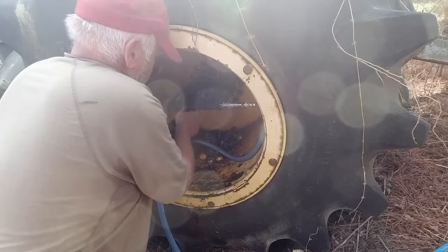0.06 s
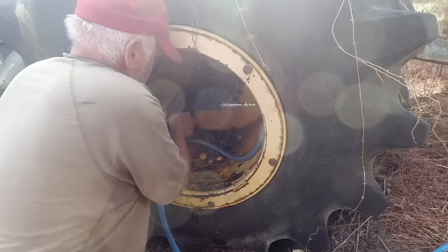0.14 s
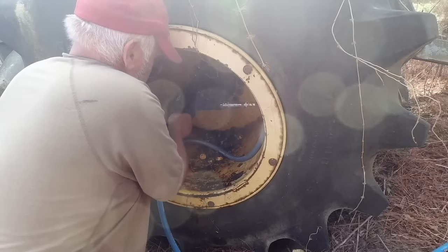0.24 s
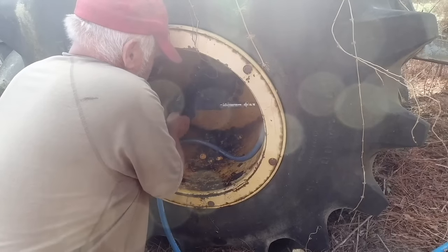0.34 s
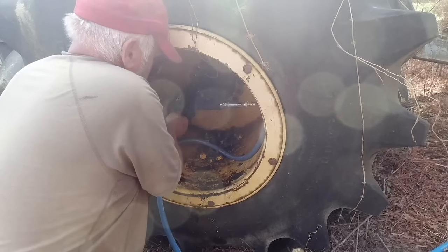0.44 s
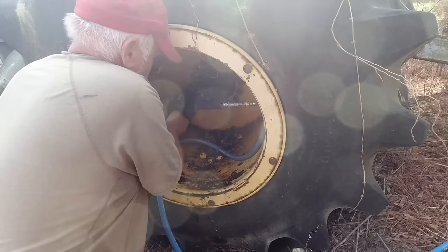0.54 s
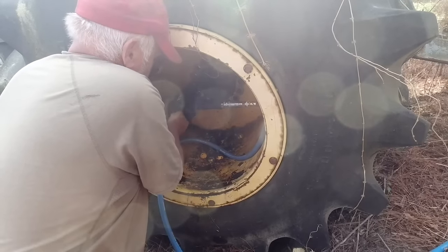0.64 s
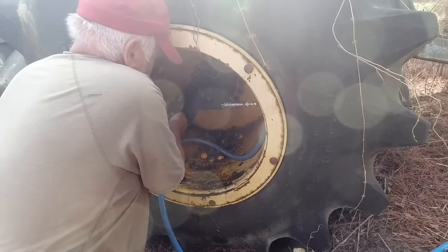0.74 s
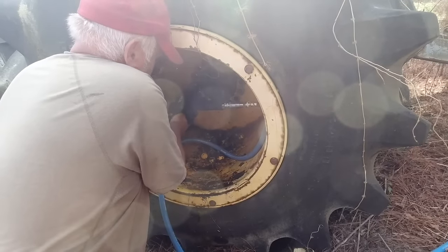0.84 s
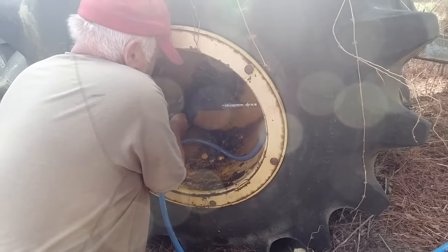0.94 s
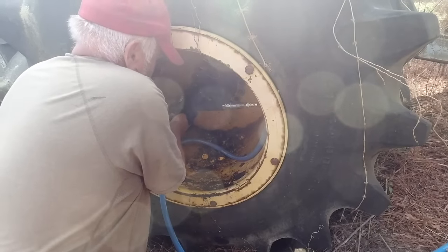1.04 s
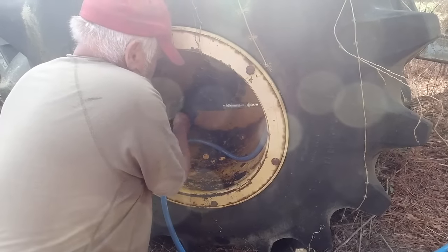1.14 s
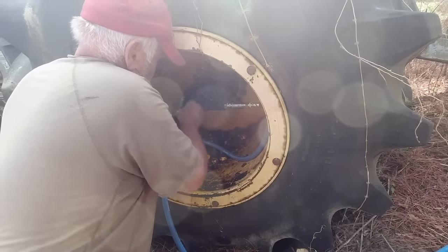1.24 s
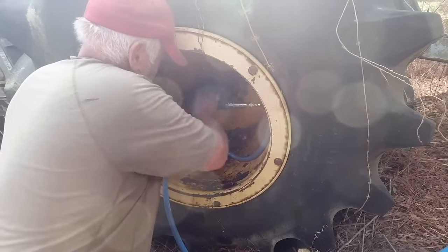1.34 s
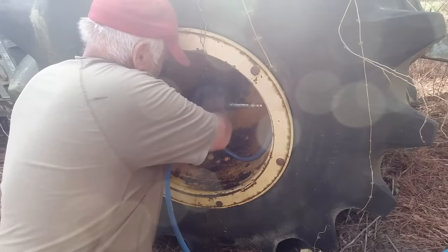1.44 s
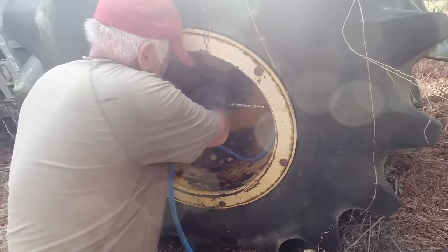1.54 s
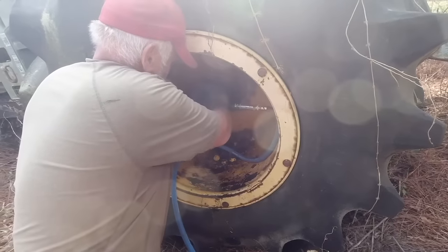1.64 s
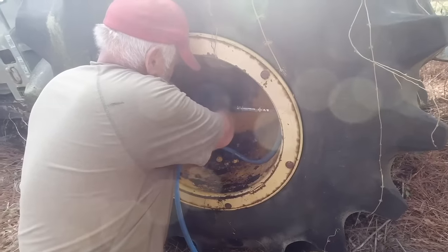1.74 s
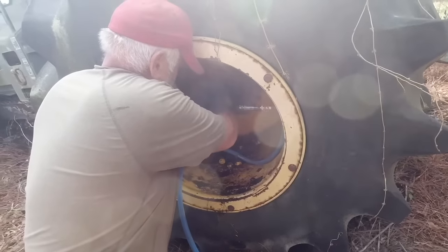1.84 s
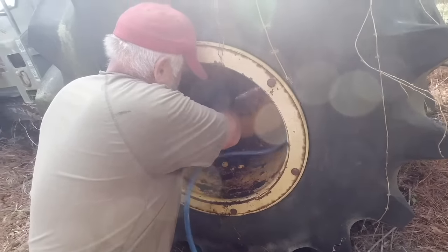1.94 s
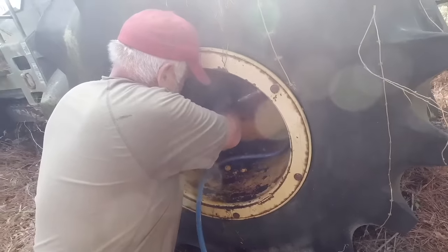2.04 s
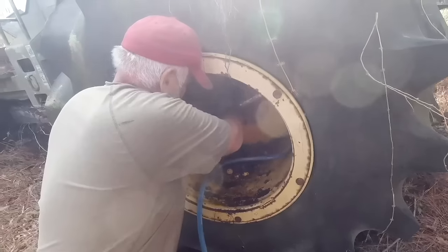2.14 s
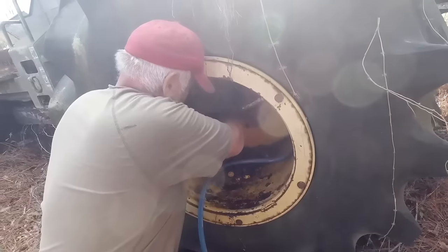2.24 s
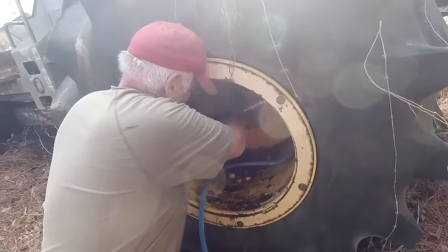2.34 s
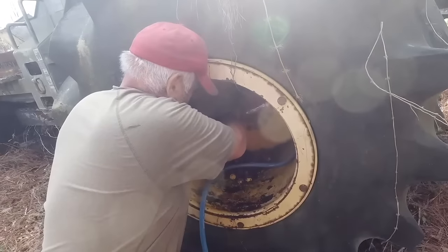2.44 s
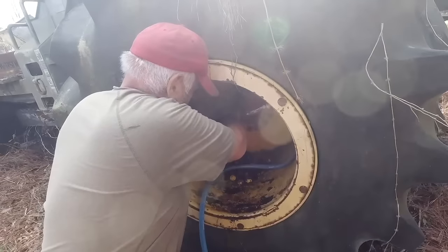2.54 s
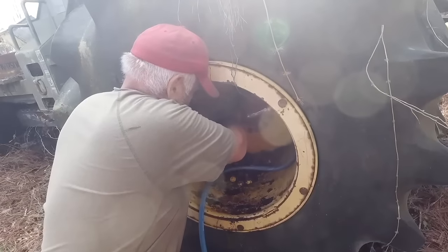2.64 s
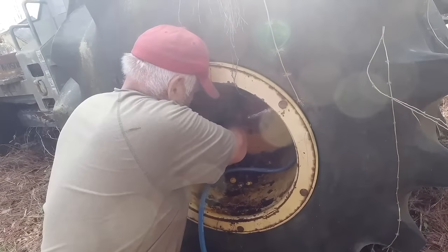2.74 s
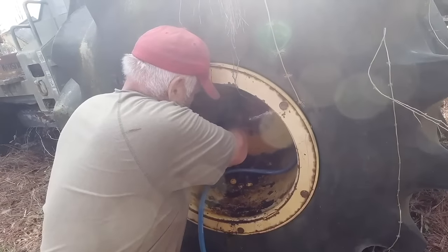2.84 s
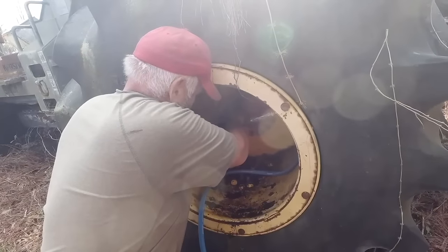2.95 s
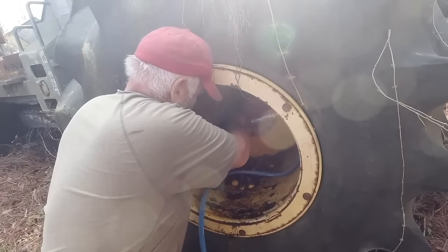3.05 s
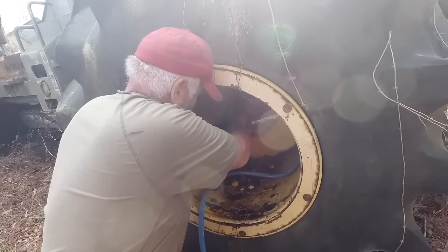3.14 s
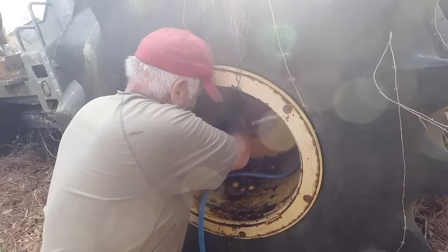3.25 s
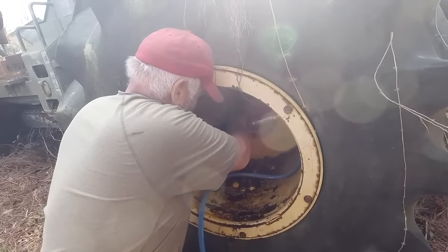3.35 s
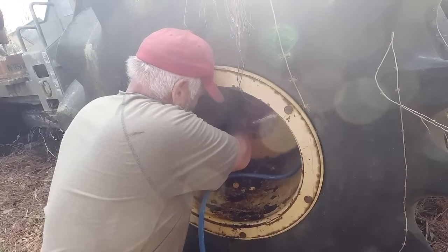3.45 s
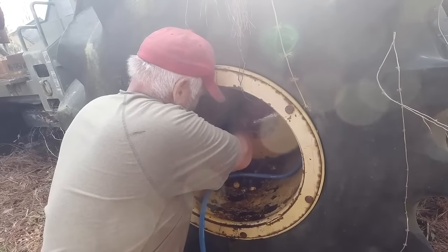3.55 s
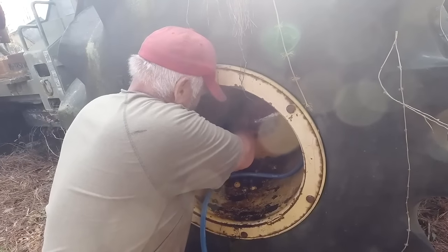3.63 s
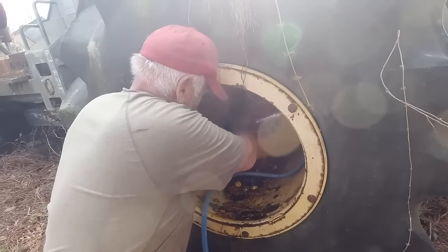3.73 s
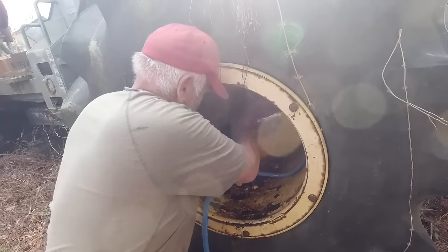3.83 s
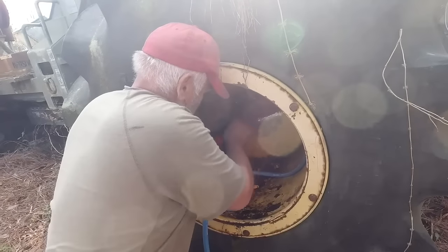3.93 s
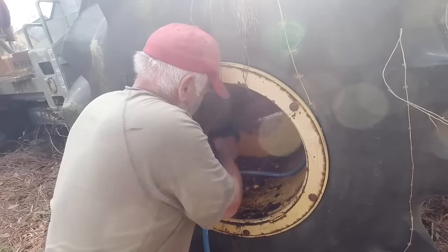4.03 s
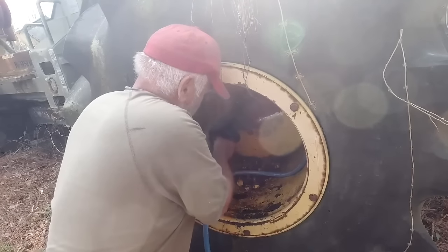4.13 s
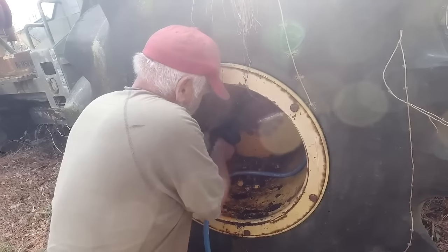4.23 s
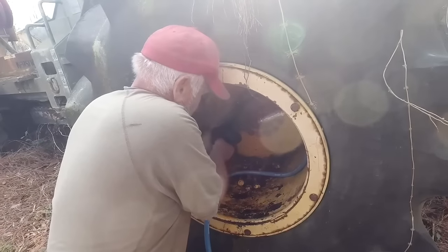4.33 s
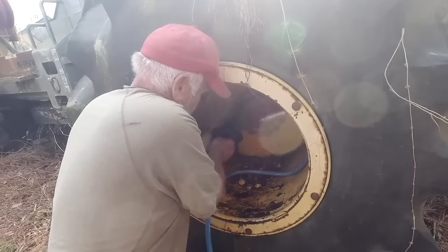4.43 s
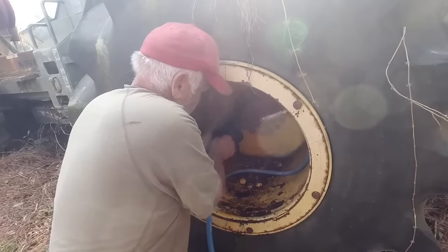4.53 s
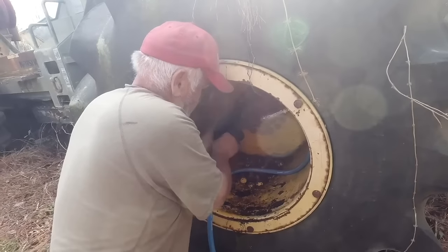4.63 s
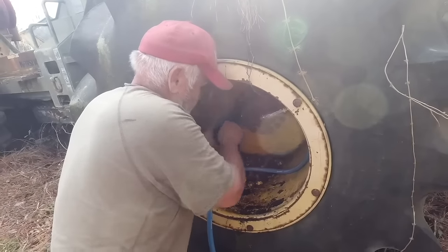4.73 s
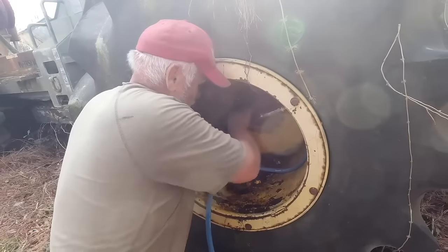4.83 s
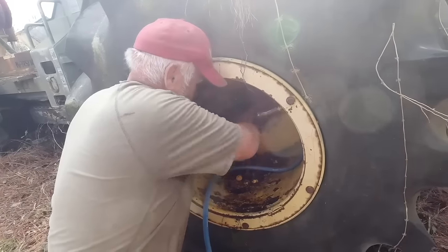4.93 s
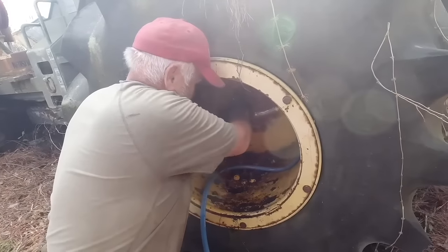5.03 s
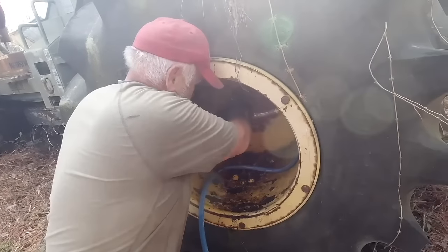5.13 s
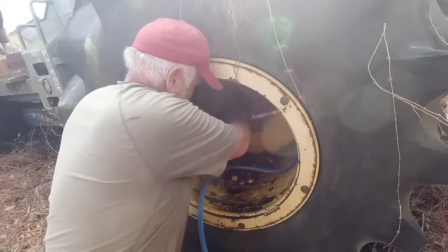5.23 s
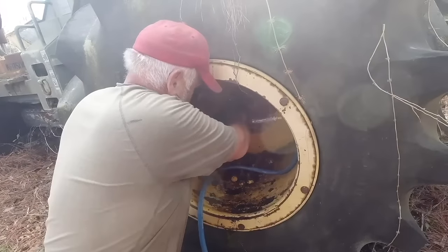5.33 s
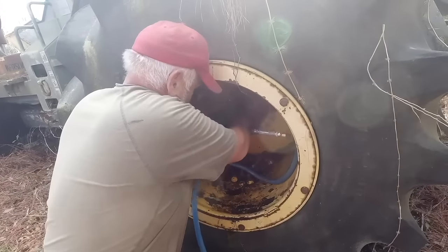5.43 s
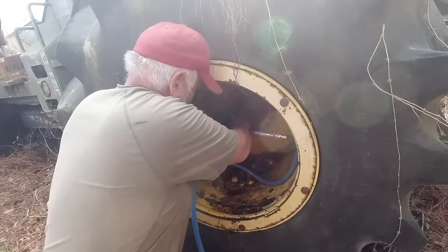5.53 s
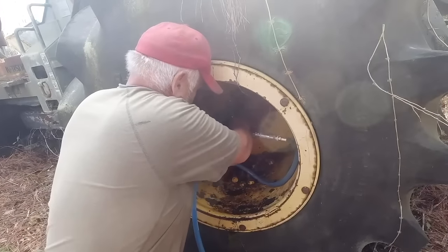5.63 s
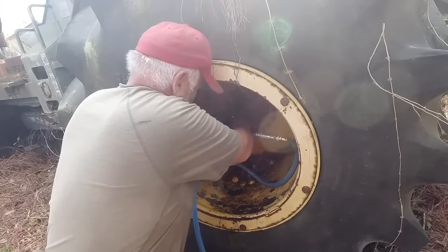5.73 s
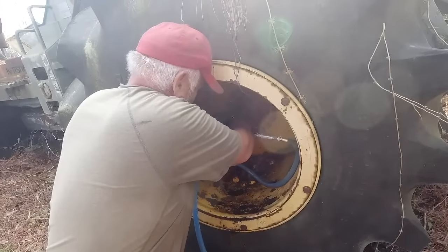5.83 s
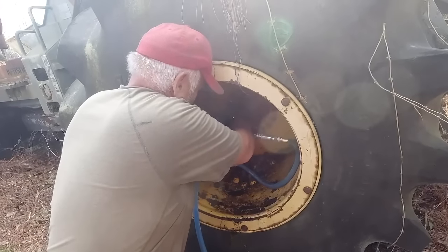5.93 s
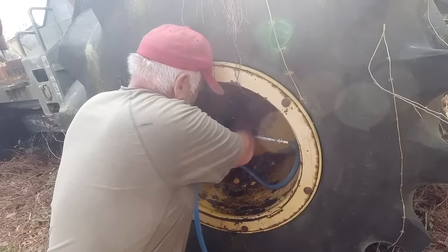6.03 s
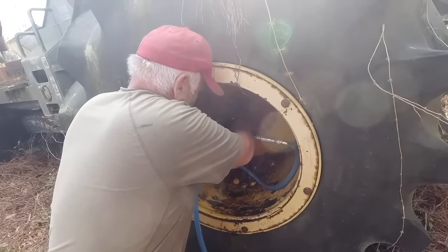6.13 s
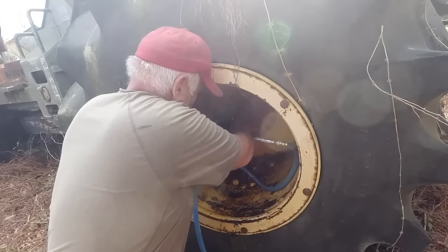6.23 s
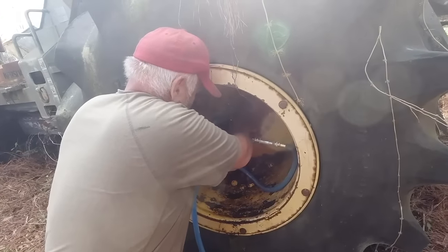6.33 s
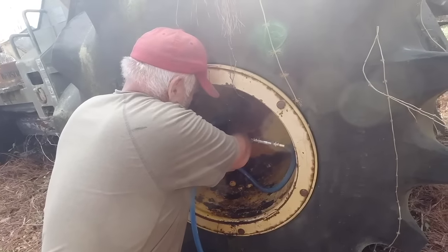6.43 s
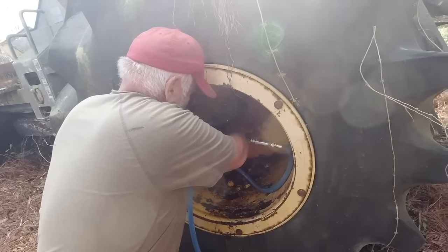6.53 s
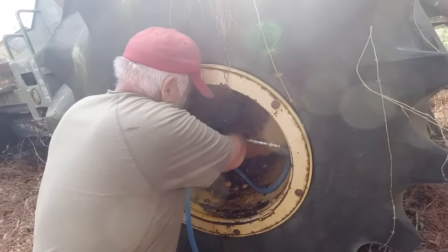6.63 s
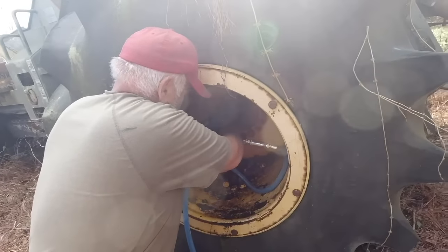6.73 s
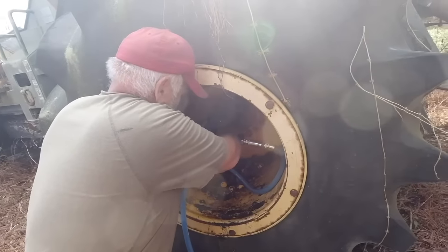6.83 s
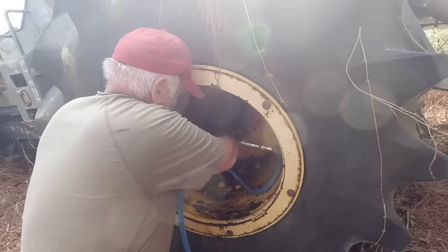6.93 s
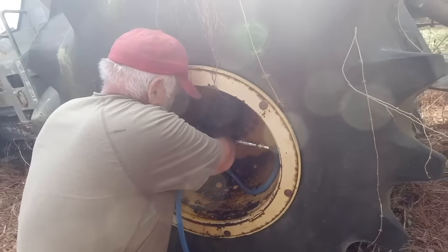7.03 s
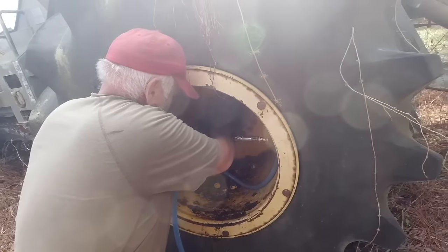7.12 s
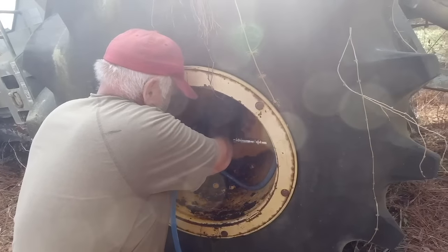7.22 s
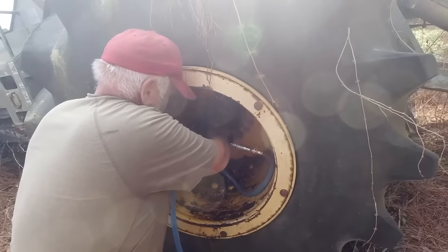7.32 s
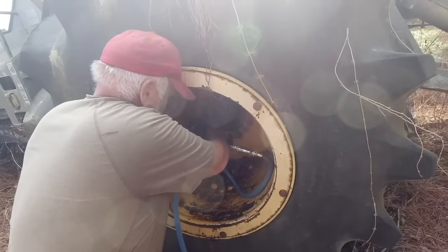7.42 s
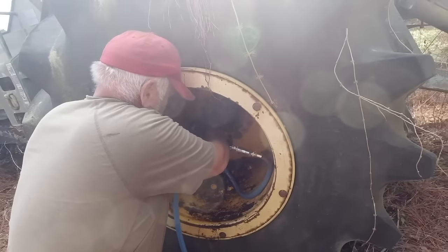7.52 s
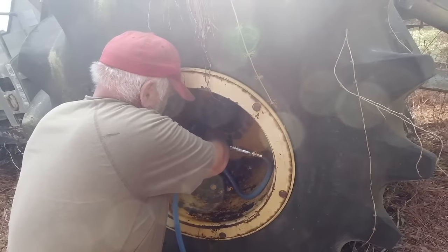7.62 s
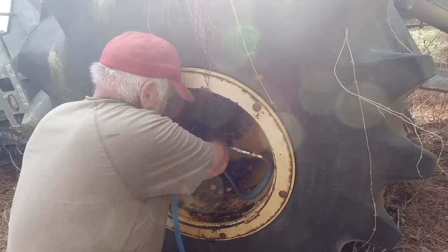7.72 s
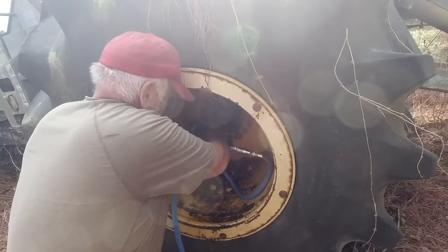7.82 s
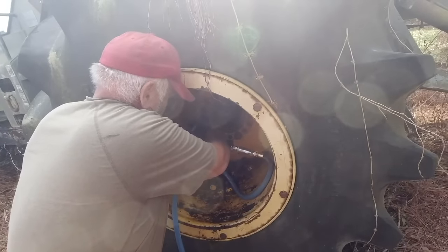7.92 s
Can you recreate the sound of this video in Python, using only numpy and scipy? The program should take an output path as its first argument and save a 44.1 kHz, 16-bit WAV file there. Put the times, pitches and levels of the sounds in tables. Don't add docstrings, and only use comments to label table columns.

```python
import sys
import numpy as np
from scipy import signal
from scipy.fft import rfft, irfft, next_fast_len
from scipy.io import wavfile
from scipy.ndimage import uniform_filter1d

SR = 44100
rng = np.random.default_rng(int(sys.argv[2]) if len(sys.argv) > 2 else 0)


def materialize(psi):
    bounded = np.clip(np.atleast_2d(psi).T, -1, 1)
    quanta = np.round(bounded * 32767).astype(np.int16)
    wavfile.write(sys.argv[1], SR, quanta)


def voltage_ratio(level):
    return 10 ** (np.asarray(level, float) / 20)


N = 351477
T = np.arange(N) / SR
SIZE = next_fast_len(N)
HZ = np.arange(SIZE // 2 + 1) * SR / SIZE
NUT_CHANGE_S = 4.5


def level(x, db):
    return x * voltage_ratio(db) / np.sqrt(np.mean(x ** 2))


def colour(hz, spectrum):
    f, db = np.transpose(spectrum)
    return voltage_ratio(np.interp(np.log(hz + 1), np.log(f), db))


def noise(spectrum):
    white = rfft(rng.standard_normal(SIZE))
    return level(irfft(white * colour(HZ, spectrum), SIZE)[:N], 0)


def walk(rate_hz):
    k = int(SR / rate_hz)
    held = np.repeat(rng.standard_normal(N // k + 1), k)
    return 1.68 * uniform_filter1d(uniform_filter1d(held, k), k)[:N]


def swells(rises):
    return sum(db * np.exp(-((T - s) / length_s) ** 2) for s, length_s, db in rises)


def ringing(hz, centre_hz, width_hz):
    return 1j * hz * width_hz / (centre_hz ** 2 - hz ** 2 + 1j * hz * width_hz)


# [multiple of the cycle rate, level/dB in the open, level/dB shaded]
ENGINE_ORDERS = [(1, -36, -29), (2, -12, -6), (3, -25, -15), (4, -6, -8), (5, 0, -4), (6, -11, -11),
                 (7, -5, -8), (8, -19, -9), (9, -17, -7), (10, -12, -4), (11, -15, -8), (12, -11, 0),
                 (13, -9, -4), (22, -17, -4), (25, -17, -3), (28, -17, -5), (30, -17, -7), (33, -19, -7),
                 (36, -11, -13), (42, -15, -30), (48, -14, -30)]
OTHER_ORDERS_DB, OTHER_SCATTER_DB, SHADED_OFFSET_DB = (-20, -11.5), 3.5, -4.5


def orders(turns, shade):
    count, step = 48, 8
    luck = rng.standard_normal((count, 3))
    db = np.array(OTHER_ORDERS_DB) + OTHER_SCATTER_DB * luck[:, :2]
    db[40:, 1] = -30
    for k, *open_and_shaded in ENGINE_ORDERS:
        db[k - 1] = open_and_shaded
    turns, shade, tone = turns[::step], shade[::step], 0
    for k in range(1, count + 1):
        open_gain = voltage_ratio(db[k - 1, 0] - 2.5)
        shaded_gain = voltage_ratio(db[k - 1, 1] - 3.1 + SHADED_OFFSET_DB)
        gain = (1 - shade) * open_gain + shade * shaded_gain
        drift = signal.resample(rng.standard_normal((2, 40)), len(turns), axis=1)
        lag = np.pi / 2 * (k % 2) + (0.55 + 0.034 * k) * luck[k - 1, 2] + 0.014 * k * drift[1]
        tone = tone - gain * voltage_ratio(1.4 * drift[0]) * np.cos(2 * np.pi * k * turns + lag)
    return signal.resample_poly(tone, step, 1)[:N]


# [f/Hz, level/dB]
OPEN_SPECTRUM = [(18, -45), (30, -20), (69, -16.5), (126, -6), (225, -9.5), (333, -3.5), (432, -19.5),
                 (923, -8.5), (1370, -13), (2250, -11.5), (4210, -20.5), (6390, -19.5), (15600, -35.5)]
# [f/Hz, level/dB]
SHADED_SPECTRUM = [(18, -37), (30, -40), (117, -9), (187, -16), (316, -3), (493, -15), (562, -11),
                   (973, -8.5), (1400, -11.5), (2370, -11.5), (4320, -21), (6070, -19.5), (15600, -32)]
# [f/Hz, level/dB]
VALVE_SPECTRUM = [(1200, -30), (2000, -4), (2350, -4), (3200, 3.5), (4300, -7), (5700, -6), (6400, 1),
                  (7500, -17), (9000, -18), (15000, -22)]
# [t/s, shade 0-1, level/dB]
SHADING = [
    (0, 0, -34.5),
    (1.5, 0, -34.5),
    (1.85, 0.4, -32),
    (3.8, 1, -38),
    (4.8, 0.98, -38),
    (5.3, 0.83, -36.5),
    (7.97, 0.65, -37.5),
]
CYCLE_HZ = 25.77
CLATTER_DB = (-4, -2.5)


def compressor():
    s, *columns = np.transpose(SHADING)
    shade, tone_db = (np.interp(T, s, c) for c in columns)
    shade = np.clip(shade, 0, 1)
    turns = CYCLE_HZ * (T - .385) + .006 * walk(1.5)
    tone = orders(turns, shade)
    clatter_db = tone_db + np.interp(shade, (0, 1), CLATTER_DB)
    since = (turns + 0.076) % 1
    puff = 1 + (1.3 - .8 * shade) * since / .14 * np.exp(-since / .14)
    clatter = (1 - shade) * noise(OPEN_SPECTRUM) + shade * noise(SHADED_SPECTRUM)
    tick = since / .06 * np.exp(-since / .06) * voltage_ratio(2.5 * walk(26)) * noise(VALVE_SPECTRUM)
    waver = voltage_ratio(.4 * walk(8))
    mechanical = waver * puff * clatter + voltage_ratio(7.0 - 4.0 * shade) * tick
    return voltage_ratio(tone_db) * tone + voltage_ratio(clatter_db - 2.0) * mechanical


# [opens t/s, shuts t/s, first air level/dB, last air level/dB]
TRIGGER_PULLS = [
    (1.885, 3.723, -18.5, -17.5),
    (5.36, 7.146, -16, -17.5),
    (7.268, 8.2, -19, -17),
]
AIR_RISE_S, AIR_FALL_DB_PER_S, AIR_SWELL_DB = .024, 750, 2


def air_flow():
    flow = 0
    for opens, shuts, first_db, last_db in TRIGGER_PULLS:
        done = np.clip((T - opens) / (shuts - opens), 0, 1)
        db = first_db + (last_db - first_db) * done + AIR_SWELL_DB * np.sin(np.pi * done)
        db = db - AIR_FALL_DB_PER_S * np.maximum(T - shuts, 0)
        opening = np.clip((T - opens) / AIR_RISE_S, 0, 1) ** 2
        flow = flow + opening * voltage_ratio(np.maximum(db, -200))
    return flow


# [f/Hz, width/Hz, level/dB on first nut, level/dB on second nut]
STEEL_MODES = [(1254, 280, -63, -3), (1660, 160, -15, -3), (1726, 85, 6, 5), (1840, 30, 5, -5),
               (1920, 270, -10, 7), (2160, 60, -5.5, 6), (2314, 20, 5.5, 6), (2762, 120, -12, -1.5),
               (2897, 220, -1, -2.5), (3560, 400, -5, -2), (3793, 230, -17, 2.5), (4080, 87, 2, 1),
               (4410, 120, -0.5, 3), (4810, 140, 2, 4), (5130, 300, 0, 0), (5270, 100, -9, -1),
               (5606, 170, -3, 4.5), (6090, 310, -3.5, -2), (6640, 114, -1.5, -5.5), (6920, 340, -1.5, -4),
               (8280, 60, -1, 2.5)]


def steel_modes(hz, nut, scatter_db):
    response = 0
    for mode in STEEL_MODES:
        db = mode[2 + nut] + scatter_db * rng.standard_normal()
        response = response + voltage_ratio(db) * ringing(hz, mode[0], mode[1])
    return response


# [f/Hz, level/dB]
HISS_SPECTRUM = [(88, -51), (150, -4), (285, -12), (346, -5), (619, -21.5), (987, 2), (1130, -12.5),
                 (1730, 0.5), (7300, -3.5), (15600, -5.5)]


def exhaust():
    shake = rfft(noise(CLASH_SPECTRUM), SIZE)
    first, second = (level(irfft(shake * steel_modes(HZ, nut, 0.), SIZE)[:N], -0.99) for nut in (0, 1))
    chatter = np.where(T < NUT_CHANGE_S, first, second) * voltage_ratio(2.0 * walk(60))
    return (noise(HISS_SPECTRUM) + chatter) * air_flow() * voltage_ratio(-3.0 + 1.54 * walk(40))


# [f/Hz, width/Hz, level/dB]
RIM_MODES = [(559.6, 16, -7.5), (707.2, 19.4, -1)]
# [rim hum level/dB, second ring level/dB, third ring level/dB, tyre thump level/dB]
WHEEL_LEVELS = [
    (-38, -33, -32.5, -45),
    (-38, -36, -34, -42),
    (-40, -38, -36, -40),
]
# [t/s, length/s, rise/dB]
HAND_EASES = [(2.03, 0.12, 5.5), (2.78, 0.15, 10), (3.1, 0.17, 7.5), (3.66, 0.059, 9), (5.42, 0.05, 6),
              (5.9, .09, 3), (6.26, 0.047, 9.5), (6.6, 0.27, 5.5), (7.0, 0.081, 10), (7.3, 0.087, 9),
              (7.6, 0.052, 6)]
# [t/s, length/s, rise/dB]
WRENCH_LURCHES = [
    (1.92, .15, 7),
    (2.8, 0.048, 6),
    (3.68, 0.13, 7),
    (5.41, 0.034, 16),
    (5.7, 0.25, 8),
    (6.1, 0.21, 7.5),
    (6.42, 0.29, 8),
    (7.08, .05, 5),
    (7.3, 0.059, 3),
    (7.95, 0.053, 2),
]
RING_FADE_DB_PER_S, WHINE_FADE_DB_PER_S = (5.5, 4, 15), (0.5, 1, 16)
BEATING_DB, BEATS_PER_S = 1.58, 9.1


def wheel(steel):
    opens, shuts = np.transpose(TRIGGER_PULLS)[:2]
    run = np.clip(np.searchsorted(opens - .05, T) - 1, 0, 2)
    running = uniform_filter1d(1. * ((T > opens[run]) & (T < shuts[run] + .012)), size=600)
    hum_db, ring_db, whine_db, thump_db = (
        c[run] + BEATING_DB * walk(BEATS_PER_S) for c in np.transpose(WHEEL_LEVELS))
    hum_db, thump_db = hum_db + swells(HAND_EASES), thump_db + swells(WRENCH_LURCHES)
    ring_db = ring_db - np.array(RING_FADE_DB_PER_S)[run] * (T - opens[run])
    whine_db = whine_db - np.array(WHINE_FADE_DB_PER_S)[run] * (T - opens[run])
    envelope = np.sqrt(uniform_filter1d(steel ** 2, size=200) + np.mean(steel ** 2))
    force = rfft(envelope * rng.standard_normal(N), SIZE)
    blow_s = np.concatenate((FIRST_BLOWS, SECOND_BLOWS, THIRD_BLOWS))
    kicks = np.zeros(N)
    kicks[((blow_s - .034) * SR).astype(int)] = voltage_ratio(2.3 * rng.standard_normal(len(blow_s)))

    def even(spectrum):
        y = irfft(spectrum, SIZE)[:N]
        return y * running / np.sqrt(uniform_filter1d(y ** 2, size=7000) + 1e-12)

    hum = ringing(HZ, 346.9, 4.9) * ringing(HZ, 377.0, 51.0)
    ring = sum(voltage_ratio(g) * ringing(HZ, f, w) * ringing(HZ, f, 210.0) for f, w, g in RIM_MODES)
    whine = ringing(HZ, 981.0, 22.0) * ringing(HZ, 1022.0, 83.0)
    whine = whine + voltage_ratio(-4.5) * ringing(HZ, 1269.0, 31.0) ** 2
    thump = ringing(HZ, 108.7, 20.4) ** 2 + voltage_ratio(-7.5) * ringing(HZ, 173.5, 31.0) ** 2
    thump = thump + voltage_ratio(-18.0) * ringing(HZ, 265.0, 63.0) ** 2
    rim = even(force * hum) * voltage_ratio(hum_db - 0.2) + even(force * ring) * voltage_ratio(ring_db + 4.0)
    rim = rim + even(force * whine) * voltage_ratio(whine_db)
    return rim + even(rfft(kicks, SIZE) * thump) * voltage_ratio(thump_db - 0.5)


FIRST_BLOWS = [1.9177, 1.9795, 2.0414, 2.1076, 2.1731, 2.238, 2.3081, 2.3734, 2.4392, 2.5046, 2.5704,
               2.6354, 2.701, 2.7643, 2.832, 2.8949, 2.9604, 3.0247, 3.0898, 3.1544, 3.2177, 3.2858, 3.351,
               3.4148, 3.4813, 3.5476, 3.612, 3.6795]
SECOND_BLOWS = [5.3966, 5.4617, 5.5243, 5.5878, 5.6555, 5.7145, 5.7764, 5.8447, 5.9076, 5.9761, 6.037,
                6.105, 6.1727, 6.2402, 6.3061, 6.3666, 6.4356, 6.5035, 6.5632, 6.6319, 6.7015, 6.7612,
                6.8263, 6.8897, 6.9566, 7.0199, 7.0938]
THIRD_BLOWS = [7.2917, 7.3542, 7.425, 7.4853, 7.553, 7.6206, 7.6808, 7.7404, 7.8054, 7.8653, 7.925]
# [full blow level/dB, first blow weaker by/dB, settling/s, catch lead/ms,
# catch minus blow level/dB]
RUN_STRENGTHS = [
    (-5, 2, .3, 20.5, -4.5),
    (-4, 1.3, 0.026, 19, -3),
    (-4, 4.5, .04, 20.5, -3.5),
]
SOCKET_SHARE_DB, BRIGHT_SHARE_DB = (-5.5, -7.5, -8.5), (-6.5, -5.5, -5)
SEATING_DB, BLOW_SCATTER_DB, CATCH_SCATTER_DB, LEAD_SCATTER_MS = 0.73, 1.38, 1.0, 1.4


def blows():
    rows = []
    for k, times in enumerate((FIRST_BLOWS, SECOND_BLOWS, THIRD_BLOWS)):
        full_db, weak_db, settle_s, lead_ms, catch_db = RUN_STRENGTHS[k]
        s = np.array(times)
        luck = rng.standard_normal((len(s), 5)).T
        slack = np.exp(-(s - s[0]) / settle_s)
        blow = full_db - weak_db * slack + BLOW_SCATTER_DB * luck[0]
        lead = lead_ms + LEAD_SCATTER_MS * luck[1]
        catch = catch_db - weak_db * slack + CATCH_SCATTER_DB * luck[2]
        socket = SOCKET_SHARE_DB[k] + 0.54 * slack + SEATING_DB * luck[3]
        bright = BRIGHT_SHARE_DB[k] - 2.5 * slack - SEATING_DB * (0.13 * luck[3] + 0.7 * luck[4])
        rows += zip(s, blow, lead, catch, socket, bright)
    return rows


# [f/Hz, level/dB]
CLASH_SPECTRUM = [(40, -62), (88, -43), (150, -32), (279, -21), (346, -5), (412, -2.5), (696, -6.5),
                  (1180, -6.5), (1770, -4.5), (2510, -3.5), (7160, -3.5), (15600, -2)]
CRACK_DB, CRACK_MS = -7.0, 3.0


def strike(s, db, rise_ms, decay_ms, socket_db, bright_db, top_hz, size=8192):
    t, hz = np.arange(size) / SR, np.arange(size // 2 + 1) * SR / size
    rise = 1 - np.exp(-(t / (rise_ms / 1000)) ** 2)
    shape = rise * np.exp(-(t / (decay_ms / 1000)) ** 1.81)
    shape = shape * (1 + voltage_ratio(CRACK_DB) * np.exp(-t * 1000 / CRACK_MS))
    bounce = voltage_ratio(1.5 * uniform_filter1d(rng.standard_normal(size), size=88) * np.sqrt(88))
    contacts = rng.standard_normal(size) * voltage_ratio(1.21 * rng.exponential(size=size)) * shape * bounce
    stray = sum(ringing(hz, f, 143.0) for f in 1500 * 2 ** (3.1 * rng.random(size=12)))
    low = 1 / (1 + (hz / 2600) ** 6)
    high = 1 / (1 + (6500 / (hz + 1)) ** 6)
    tilt = voltage_ratio(1.3 * (socket_db + 5.5) * low + 1.64 * (bright_db + 6.5) * high)
    tilt = tilt / (1 + 1j * hz / top_hz) ** 2
    modes = voltage_ratio(8.5) * steel_modes(hz, int(s > NUT_CHANGE_S), 2.3) + voltage_ratio(7.5) * stray
    y = irfft(rfft(contacts) * colour(hz, CLASH_SPECTRUM) * tilt * (1 + modes), size)
    return y * voltage_ratio(db) / np.sqrt(uniform_filter1d(y ** 2, size=530).max())


def add(out, s, y):
    i = int(s * SR)
    out[i:i + len(y)] += y[:N - i]


# [t/s, level/dB, rattle decay/ms, bright share/dB]
LOOSE_KNOCKS = [
    (1.882, -25, 16, -15),
    (3.710, -12, 13, -11),
    (3.789, -28.5, 25, -9),
    (5.350, -26, 23, -6),
    (7.122, -5.5, 28, -5),
    (7.207, -24, 54, -12.5),
    (7.252, -19.5, 18, -6),
    (7.267, -18, 20, -17),
]


def hammer():
    out = np.zeros(N)
    for s, db, lead_ms, catch_db, socket_db, bright_db in blows():
        catch = strike(s, db + catch_db - 3.5, 8., 16., socket_db, bright_db, 14000.0)
        add(out, s - lead_ms / 1000 - .003, catch)
        decay_ms = 20. if s < NUT_CHANGE_S else 25.
        add(out, s - .0013, strike(s, db - 1.5, 1.8, decay_ms, socket_db, bright_db, 15000.))
    for s, db, decay_ms, bright_db in LOOSE_KNOCKS:
        add(out, s, strike(s, db - 6.0, 2.5, decay_ms, -10.5, bright_db, 8700.0))
    return out


YARD_T60_S, YARD_DB = .16, -18


def yard(near):
    t = np.arange(8000) / SR
    echoes = rng.standard_normal(8000) * np.exp(-np.log(1000) * t / YARD_T60_S) * (t > .004)
    echoes = signal.lfilter([.5], [1, -.5], echoes)
    return voltage_ratio(YARD_DB) * signal.fftconvolve(near, echoes / np.sqrt(np.sum(echoes ** 2)))[:N]


def scene():
    steel = hammer()
    near = steel + wheel(steel) + exhaust()
    return (near + yard(near) + compressor())[None]


def band_limit(x):
    return signal.sosfilt(signal.butter(12, 15710, fs=SR, output="sos"), x)


def record(dry):
    ceiling = .86
    x = dry / (1 + np.abs(dry / ceiling) ** 6) ** (1 / 6)
    x = signal.sosfilt(signal.butter(2, 32, "highpass", fs=SR, output="sos"), x)
    return band_limit(x)


dry = scene()
out = record(dry)
materialize(out)
```